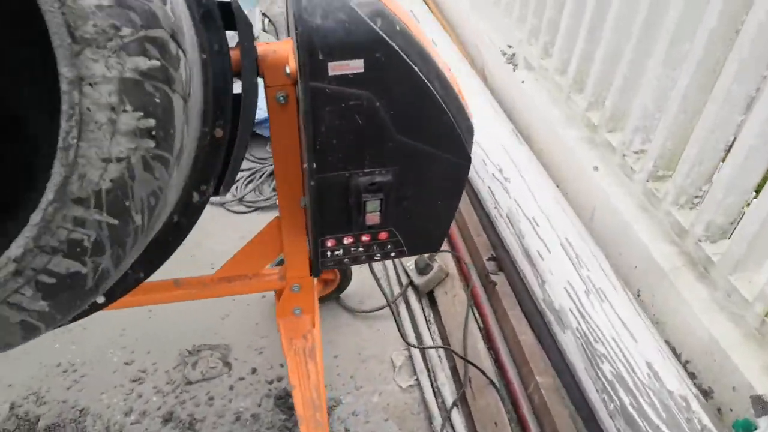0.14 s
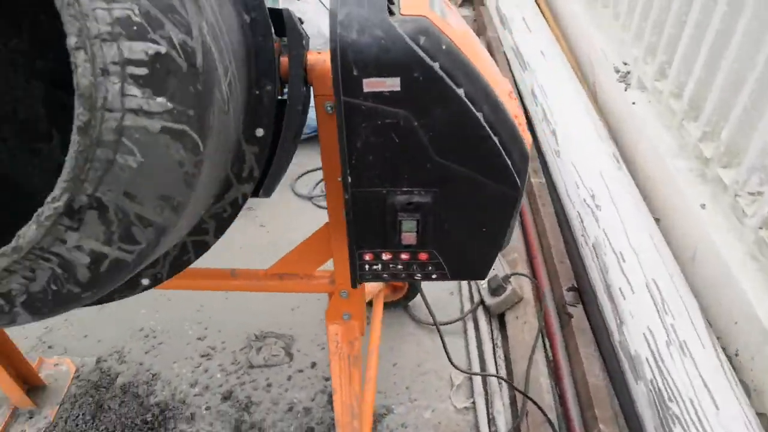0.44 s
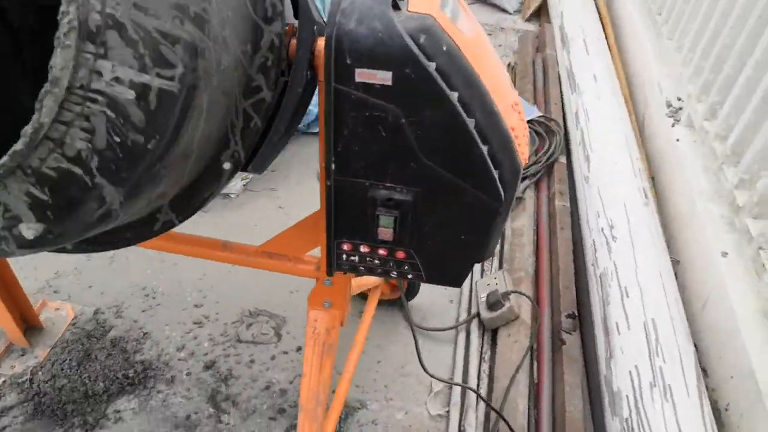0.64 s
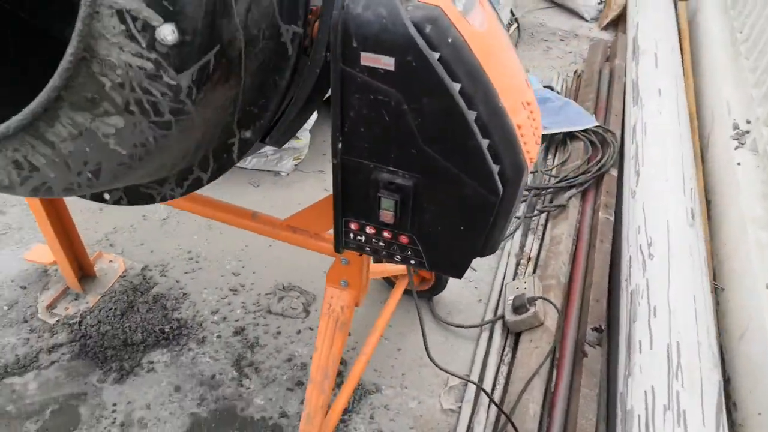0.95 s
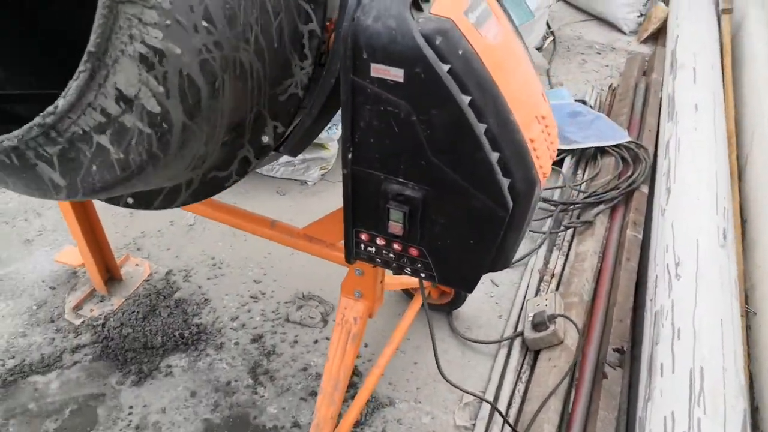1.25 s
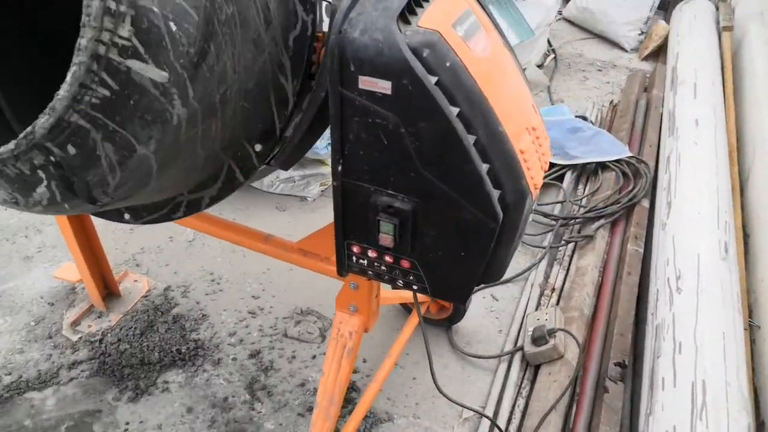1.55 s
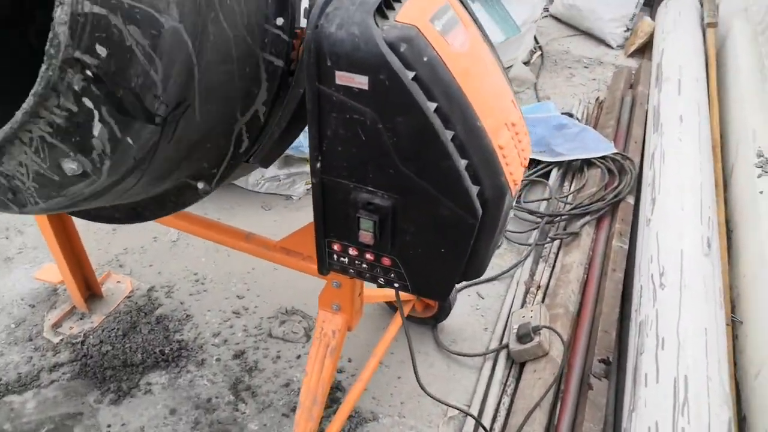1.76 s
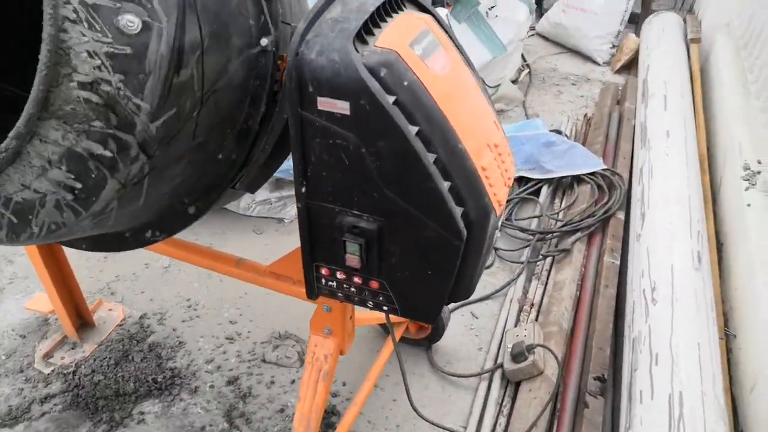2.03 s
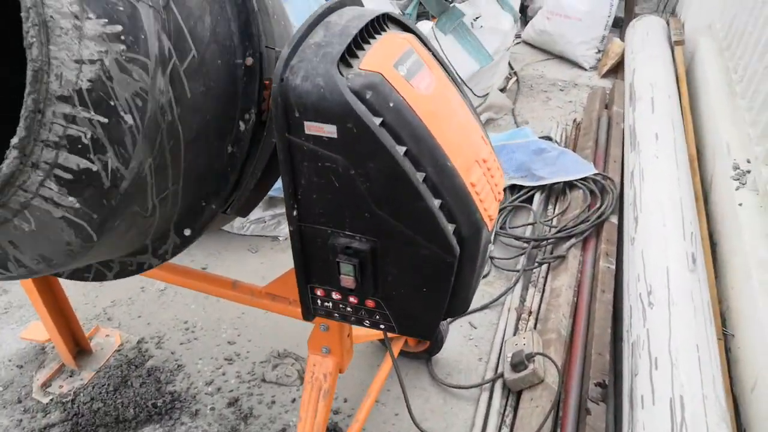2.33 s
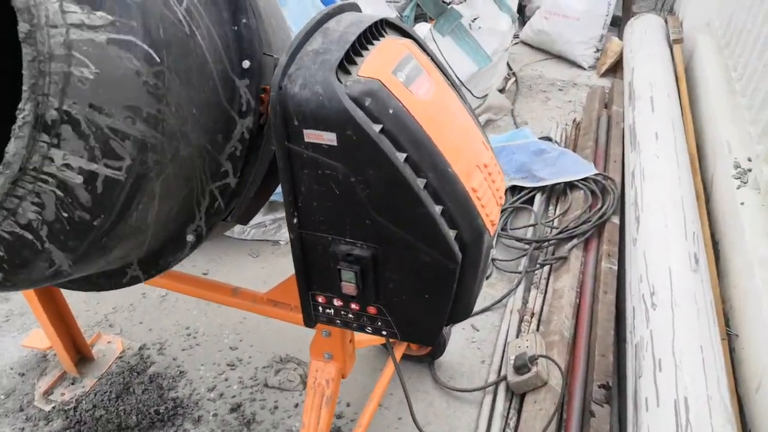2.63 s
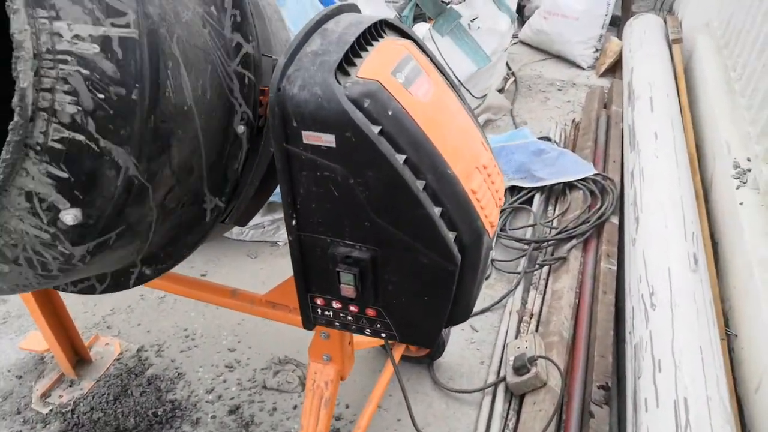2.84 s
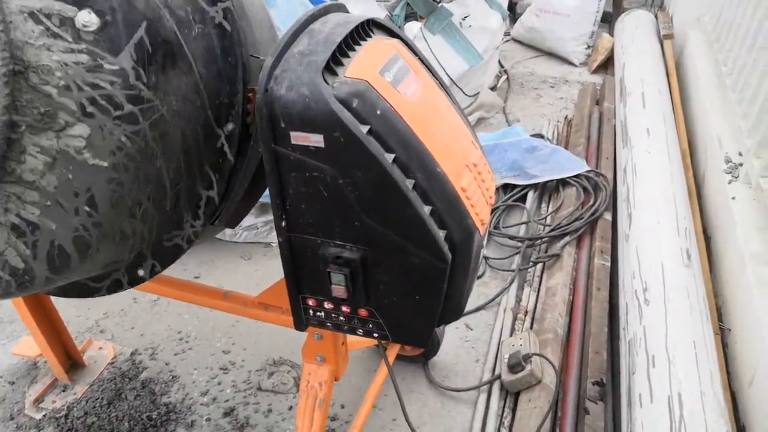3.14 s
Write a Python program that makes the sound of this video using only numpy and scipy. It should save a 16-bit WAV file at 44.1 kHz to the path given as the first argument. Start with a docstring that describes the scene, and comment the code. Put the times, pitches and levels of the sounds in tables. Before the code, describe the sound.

An electric concrete mixer runs close to the microphone outdoors: fast, metallic gear rattle over motor hum and wet rumbling, broken by clusters of hard clanks near one, one and a half and three seconds.

```python
"""Electric concrete mixer up close

A pinion rattles tooth by tooth along the drum's ring gear; each tooth is a chattering contact that rings steel.
Now and then the gear jams: hard clanks ring out, the frame shudders and the drum booms.
Below, sines make the motor's hum and the drum's drone at the tooth rate; coloured noise makes the wet mix
rumble, slosh and slide, and rubbing steel whine and hiss."""
import sys
import numpy as np
from scipy import signal
from scipy.fft import rfft, irfft
from scipy.io import wavfile

SR = 44100
rng = np.random.default_rng(int(sys.argv[2]) if len(sys.argv) > 2 else 0)


def bounce(signal):
    """Save signal as a 16-bit WAV file at the path given by the first command-line argument."""
    frames = np.transpose(np.atleast_2d(signal))
    limited = np.clip(frames, -1, 1)
    pcm = np.round(limited * 32767).astype(np.int16)
    wavfile.write(sys.argv[1], SR, pcm)


N = 145089
T = np.arange(N) / SR  # seconds
BLOW_SIZE = 8192  # samples in the sound of one blow
BLOW_T = np.arange(BLOW_SIZE) / SR
BLOW_HZ = np.fft.rfftfreq(BLOW_SIZE, 1 / SR)

# How hard the teeth meet and where the contact rings.
# Each row: time in seconds, level in dB before the teeth's trim, favoured ring in Hz.
CONTACT_PATH = [(0, -21.5, 2800), (.05, -29, 2500), (.12, -29, 2600), (.18, -39, 2600), (.27, -28.5, 2650),
                (.33, -31.5, 2350), (.43, -18.5, 2470), (.55, -23, 2550), (.61, -19.5, 2600),
                (.71, -25.5, 2250), (.79, -21, 2400), (.87, -22, 2650), (.92, -35.5, 2000),
                (1.0, -29, 2000), (1.15, -32.5, 2050), (1.3, -20, 2250), (1.37, -24, 2400),
                (1.42, -22, 2600), (1.57, -24, 2700), (1.72, -42.5, 2300), (1.85, -32, 2600),
                (1.92, -40, 2200), (2.0, -32, 1900), (2.17, -54, 2250), (2.23, -80, 2400),
                (2.45, -37, 2400), (2.51, -28.5, 2400), (2.67, -25, 2800), (2.77, -33.5, 2400),
                (2.82, -28, 2250), (2.95, -25, 2000), (3.0, -31.5, 2100), (3.06, -24.5, 2100),
                (3.23, -37.5, 2260), (3.29, -26.5, 2290)]


def amp(db):
    """Decibels to gain."""
    return 10 ** (np.asarray(db) / 20)


def evened(x):
    """Scales to an rms of one."""
    return x / np.sqrt(np.mean(x ** 2) + 1e-20)


def curve(points, t, axis=1):
    """Reads one column of a table over time, in straight lines between rows."""
    p = np.array(points)
    return np.interp(t, p[:, 0], p[:, axis])


def colour(points, hz):
    """Gain of a spectrum table at these frequencies, joined along log frequency."""
    f, db = np.transpose(points)
    return amp(np.interp(np.log(hz + 1), np.log(f), db))


def add(mix, s, sound):
    """Mixes a sound in at a time in seconds."""
    part = mix[max(round(s * SR), 0):][:len(sound)]
    part += sound[:len(part)]


def shaped_noise(gain):
    """White noise with this gain across its spectrum, at unit rms."""
    return evened(irfft(rfft(rng.standard_normal(N)) * gain, N))


def noise(points):
    """Noise of a given colour, at unit rms."""
    return shaped_noise(colour(points, np.fft.rfftfreq(N, 1 / SR)))


def drift(hz):
    """Random wander below about this rate, at unit rms."""
    return shaped_noise(np.exp(-(np.fft.rfftfreq(N, 1 / SR) / hz) ** 2))


def causal(gain):
    """Spectrum of the promptest (minimum-phase) response with this gain."""
    log_gain = np.log(np.r_[gain, gain[-2:0:-1]])
    return np.exp(np.conj(signal.hilbert(log_gain)))[:len(gain)]


def treble(db):
    """Shelf that lifts or lowers the top of a blow."""
    corner_hz = 3100
    return causal(amp(db * BLOW_HZ ** 8 / (BLOW_HZ ** 8 + corner_hz ** 8)))


def contact(s, gain):
    """The place where the teeth meet at this moment favours one broad ring."""
    width_hz = 553
    return 1 + gain / (1 + 2j * (BLOW_HZ - curve(CONTACT_PATH, s, axis=2)) / width_hz)


def body(points, ring_db, wash_db, wash_t60):
    """Response of the steel at one spot: the blow itself, its clear modes and a dense wash of weak ones."""
    # Modes of the ring gear and drum. Each row: pitch in Hz, relative level in dB, 60 dB decay in seconds.
    modes = [(884, 3.5, .09), (1377, -4, 0.29), (1530, -11.5, 0.21), (1662, -11, .12), (2050, -8, 0.2),
             (2224, -2.5, 0.072), (2650, -9.5, 0.062), (2620, -15.5, 0.027), (2986, 5.5, 0.089),
             (3520, -2, 0.15), (3600, -4, 0.18), (4000, -4.5, .04)]
    ring = sum(amp(db - 60 * BLOW_T / t60) * np.cos(2 * np.pi * hz * BLOW_T) for hz, db, t60 in modes)
    wash = rng.standard_normal(BLOW_SIZE) * amp(-60 * BLOW_T / wash_t60)
    response = (BLOW_T == 0) + amp(ring_db) * ring / np.linalg.norm(ring)
    response = response + amp(wash_db) * wash / np.linalg.norm(wash)
    return rfft(response) * causal(colour(points, BLOW_HZ))


def strike(response, chatter_s, chatter_per_s, first, rise_s):
    """One contact and its swelling, dying chatter ring the steel."""
    hits = rng.random(BLOW_SIZE) < chatter_per_s / SR
    envelope = np.exp(-BLOW_T / chatter_s) * (1 - np.exp(-BLOW_T / rise_s))
    clicks = rng.standard_normal(BLOW_SIZE) * hits * envelope
    clicks[0] = first
    sound = irfft(rfft(clicks) * response)
    # the energy of a unit rms held for 20 ms
    return evened(sound) * np.sqrt(.02 * SR / BLOW_SIZE)


def wet_mix(tooth_count):
    """The load rumbles in the drum, shaken by each tooth; it sloshes and slides grittily along the wall."""
    # Colours of the three noises. Each row: frequency in Hz, relative level in dB.
    rumble_colour = [(20, -17.5), (40, -30), (55, 1.5), (75, 4), (88, 4.5), (115, 12), (148, -1), (190, 6),
                     (240, 3.5), (320, 4), (360, -11.5), (450, -34), (650, -20.5), (1500, -64),
                     (4000, -68.5)]
    slosh_colour = [(150, -26.5), (330, -1), (450, 2.5), (680, 4.5), (950, 4.5), (1200, -12), (2500, -18.5),
                    (8000, -67.5)]
    slide_colour = [(300, -18), (550, -35), (750, -16.5), (880, -2), (1150, 0), (1400, -6.5), (1700, 2),
                    (2500, -1), (3600, -3), (5000, -10), (6500, -23), (7400, -30.5), (8300, -39),
                    (12000, -50), (15000, -44)]
    # Their levels, around which they wander. Each row: time in seconds, level in dB.
    rumble_level = [(0, -38.5), (.55, -37), (.95, -43.5), (1.08, -33), (1.2, -39), (1.45, -39.5),
                    (1.61, -29.5), (1.72, -39), (2.35, -41), (2.65, -39), (3.05, -41.5), (3.14, -33.5),
                    (3.29, -43)]
    slosh_level = [(0, -49), (.15, -49.5), (.6, -42.5), (.85, -48), (1.02, -59), (1.07, -30.5), (1.2, -62),
                   (1.45, -46), (1.6, -44.5), (1.75, -53.5), (1.95, -47.5), (2.35, -63.5), (2.6, -46.5),
                   (3.0, -50.5), (3.13, -40), (3.29, -66.5)]
    slide_level = [(0, -40.5), (.7, -36.5), (1.2, -38.5), (1.85, -41.5), (2.35, -43), (2.7, -40),
                   (3.29, -41)]
    shake_db, lag_teeth = 2, 0.35
    shake = shake_db * np.cos(2 * np.pi * (tooth_count - lag_teeth))
    rumble = noise(rumble_colour) * amp(curve(rumble_level, T) + shake + 2.84 * drift(32))
    slosh = noise(slosh_colour) * amp(curve(slosh_level, T) + 3.1 * drift(60))
    grit = 1.9 * drift(15) + 0.93 * drift(250)  # slow and fast wander, dB
    slide = noise(slide_colour) * amp(curve(slide_level, T) + grit)
    return rumble + slosh + slide


def rubbing():
    """Rubbing steel sings in two fuzzy whines, narrow bands of noise; a faint high hiss fades early on."""
    # Colours of the whines and hiss. Each row: frequency in Hz, relative level in dB.
    low_colour = [(300, -60), (720, -20), (815, -7), (865, 1), (930, -5), (1020, -25), (3000, -61)]
    high_colour = [(300, -63.5), (1150, -26.5), (1320, -5), (1380, -3), (1450, 1.5), (1550, -22),
                   (4000, -65.5)]
    hiss_colour = [(3000, -37.5), (8000, -7), (11000, -8.5), (14800, 2.5), (16000, 3)]
    # Levels of the upper whine and the hiss. Each row: time in seconds, level in dB.
    high_level = [(0, -54), (1.2, -39.5), (2.1, -57), (2.3, -45), (2.75, -39.5), (2.9, -55.5), (3.29, -64)]
    hiss_level = [(0, -63.5), (.55, -76), (.95, -96), (3.29, -98)]
    low = noise(low_colour) * amp(-50.5 + 2.3 * drift(15))
    high = noise(high_colour) * amp(curve(high_level, T))
    hiss = noise(hiss_colour) * amp(curve(hiss_level, T))
    return low + high + hiss


def motor():
    """The motor hums on one slightly wavering sine."""
    # Strength of the hum. Each row: time in seconds, rms level in dB.
    hum_level = [(0, -36.5), (.6, -38), (1.5, -41.5), (2.2, -55), (3.29, -50.5)]
    hum_hz = 104.2
    hum = np.sin(2 * np.pi * hum_hz * T + 0.18 * drift(5.4))
    return np.sqrt(2) * amp(curve(hum_level, T)) * hum


def drone(tooth_count):
    """The drum hums on multiples of the tooth rate, each wavering in level and phase."""
    # Partials of the drone. Each row: multiple of the tooth rate, rms level in dB.
    partials = [(1, -48.5), (2, -47.5), (3, -51.5), (4, -49), (5, -51), (6, -49.5), (7, -59)]
    out = np.zeros(N)
    for multiple, db in partials:
        level = amp(db + 1.7 * drift(6.3))
        phase = 2 * np.pi * (multiple * tooth_count + rng.random()) + 0.22 * drift(4.6)
        out += np.sqrt(2) * level * np.cos(phase)
    return out


def boom():
    """The drum booms on a sinking note as the gear springs free."""
    # Middle of each boom, in seconds.
    surges = [1.145, 3.215]
    level_db, width_s = -30.5, .055
    middle_hz, sag_hz_per_s = 117, 70
    out = np.zeros(N)
    for s in surges:
        t = T - s
        swell = np.exp(-(t / width_s) ** 2)
        out += swell * np.sin(2 * np.pi * t * (middle_hz - .5 * sag_hz_per_s * t))
    return np.sqrt(2) * amp(level_db) * out


def frame():
    """The stand shudders briefly under each jam: a low sine swells and dies."""
    # Shudders. Each row: start in seconds, peak level in dB.
    thumps = [(0.086, -27), (1.035, -30), (1.576, -31), (2.104, -35), (3.095, -24.5), (3.132, -26)]
    frame_hz, rise_s, decay_s = 71, 0.015, 0.027
    out, t = np.zeros(N), T[:SR // 2]
    swell = (1 - np.exp(-t / rise_s)) ** 2 * np.exp(-t / decay_s)
    for s, db in thumps:
        add(out, s, amp(db) * swell / swell.max() * np.sin(2 * np.pi * frame_hz * t))
    return out


def clanks():
    """The gear rides up on a tight spot and drops back with a few hard knocks that ring the steel."""
    # Knocks. Each row: start in seconds, level in dB before the trim, treble lift in dB before the extra lift.
    knocks = [(.061, -18, -4.5), (.090, -17.5, -2), (0.238, -23.5, -9), (0.407, -50, -12),
              (.776, -27.5, -6.5), (.981, -23, -9), (1.027, -18.5, -18), (1.037, -15, 5.5),
              (1.061, -16.5, 2), (1.092, -18.5, 5.5), (1.274, -47, -4), (1.494, -21, -5.5),
              (1.579, -14, -8.5), (1.601, -19, -11), (1.619, -18, -7), (1.668, -19.5, -8.5),
              (1.823, -34.5, -7), (2.1, -26.5, -4), (2.126, -24, -1.5), (2.154, -25.5, -12),
              (2.305, -35, 0), (2.802, -33.5, -2), (3.089, -18, -10), (3.102, -19.5, 7.5),
              (3.126, -15.5, 1), (3.156, -15.5, -2)]
    # Colour of a clank. Each row: frequency in Hz, relative level in dB.
    clank_colour = [(150, -18.5), (450, -26.5), (900, -6.5), (1400, 1), (2200, 6.5), (3000, 2.5), (3300, 2),
                    (4000, 2), (4600, -10.5), (5700, -18.5), (7000, -35), (8300, -57.5), (15000, -73.5)]
    trim_db, extra_lift_db, contact_gain = -2, 5, 1.43
    out = np.zeros(N)
    for s, db, treble_db in knocks:
        steel = body(clank_colour, ring_db=-10.5, wash_db=2.5, wash_t60=0.11)
        steel = steel * treble(treble_db + extra_lift_db) * contact(s, contact_gain)
        knock = strike(steel, chatter_s=.005, chatter_per_s=4000, first=.9, rise_s=.0005)
        add(out, s, amp(trim_db + db) * knock)
    return out


def teeth(tooth_count):
    """Each tooth lands, chatters and rings the gear briefly."""
    # Colour of a tooth. Each row: frequency in Hz, relative level in dB.
    tooth_colour = [(200, -17.5), (550, -20), (950, -19.5), (1150, -6.5), (1400, -2), (2200, -1.5),
                    (3050, -4), (3300, -8), (4000, -5.5), (4550, -17.5), (5000, -16), (5600, -26),
                    (7000, -34), (8300, -51), (15000, -63.5)]
    # How long a tooth drags. Each row: time in seconds, chatter decay in seconds.
    drag = [(0, 0.0083), (.45, 0.01), (.85, 0.0063), (1.05, .007), (1.3, 0.0075), (1.55, 0.0032),
            (1.9, 0.0062), (2.3, 0.0051), (2.55, 0.0079), (3.29, 0.0075)]
    # Brightness of the teeth. Each row: time in seconds, treble lift in dB.
    brightness = [(0, 2), (.3, 6), (.6, 5.5), (.75, 4.5), (.95, -3.5), (1.3, -0.5), (1.55, -7.5),
                  (1.85, 11), (2.05, 4.5), (2.55, 7), (2.7, 0.5), (2.85, 5.5), (3.0, -7.5), (3.29, -1)]
    trim_db, spread_db, jitter_s, contact_gain = -3, 0.9, .0005, 5.24
    out = np.zeros(N)
    landings = T[np.diff(np.floor(tooth_count), prepend=-1) > 0]  # each whole count is a tooth
    for s in landings:
        steel = body(tooth_colour, ring_db=-11, wash_db=1, wash_t60=.036)
        steel = steel * treble(curve(brightness, s)) * contact(s, contact_gain)
        late, force = rng.standard_normal(2)
        sound = strike(steel, chatter_s=curve(drag, s), chatter_per_s=5000, first=0.75, rise_s=.001)
        level_db = trim_db + curve(CONTACT_PATH, s) + spread_db * force
        add(out, s + jitter_s * late, amp(level_db) * sound)
    return out


def scene():
    """All parts of the mixer; one gear speed drives the teeth, the drone and the shaking of the mix."""
    # Gear speed, sagging before a jam and surging after it. Each row: time in seconds, teeth per second.
    speed = [(0, 54.35), (.45, 54.35), (.9, 53.53), (1.03, 53.46), (1.14, 56.5), (1.3, 54.17), (1.5, 54.9),
             (1.6, 56.04), (1.75, 52.93), (1.9, 54.05), (2.7, 54.11), (3.08, 52.76), (3.2, 59.06),
             (3.29, 53.64)]
    tooth_count = np.cumsum(curve(speed, T)) / SR
    background = wet_mix(tooth_count) + rubbing() + motor() + drone(tooth_count)
    jams = boom() + frame() + clanks()
    return (background + jams + teeth(tooth_count))[None]


def record(dry):
    """The band limit of the recorder: a steep low-pass."""
    edge_hz = 15400
    low_pass = signal.firwin(511, edge_hz, window=("kaiser", 9), fs=SR)
    return signal.oaconvolve(dry, low_pass[None], "same")


dry = scene()
out = record(dry)
bounce(out)
```